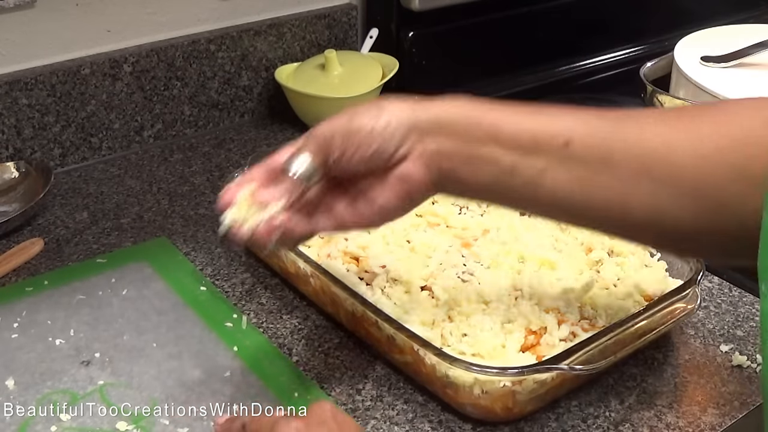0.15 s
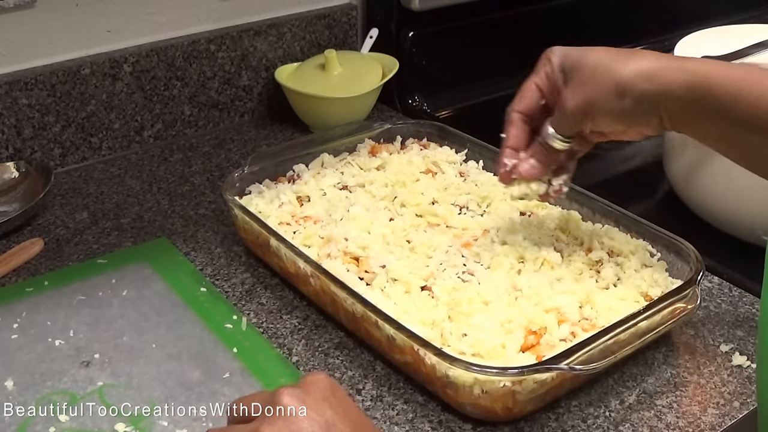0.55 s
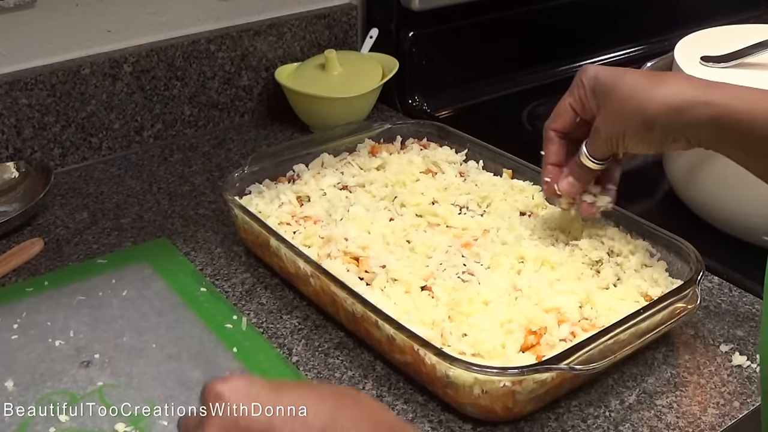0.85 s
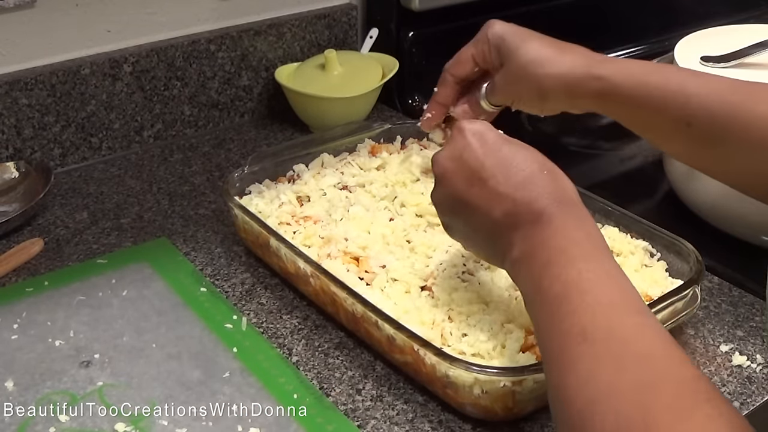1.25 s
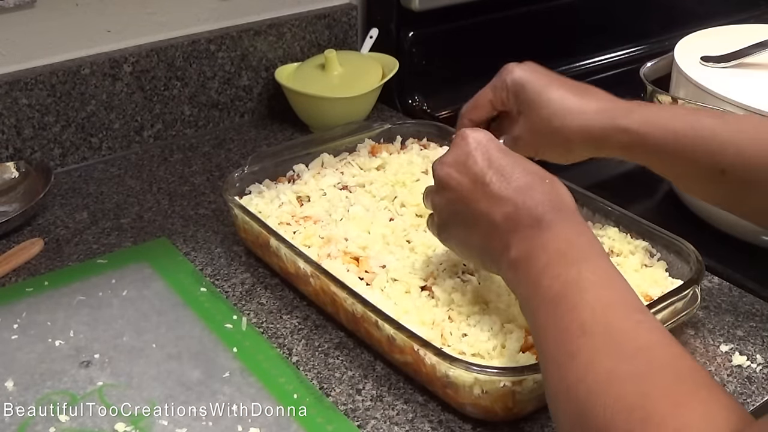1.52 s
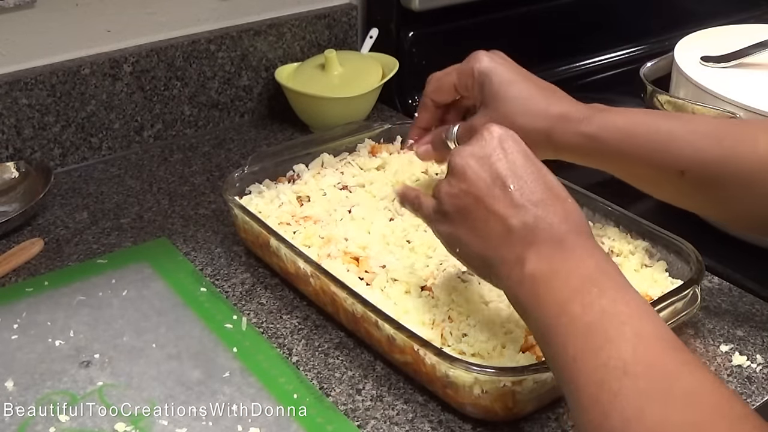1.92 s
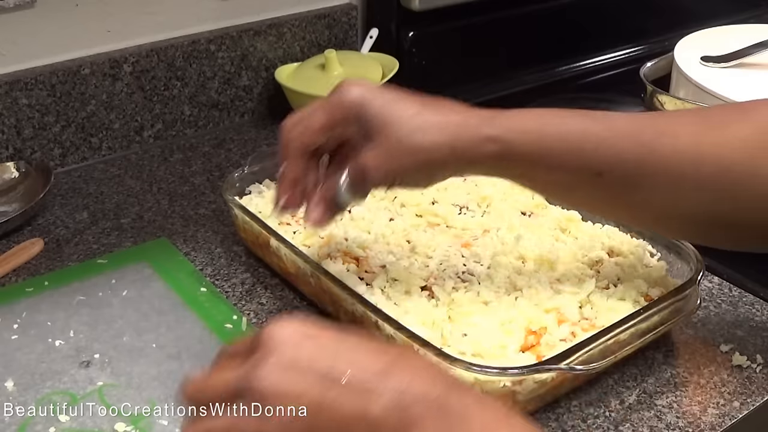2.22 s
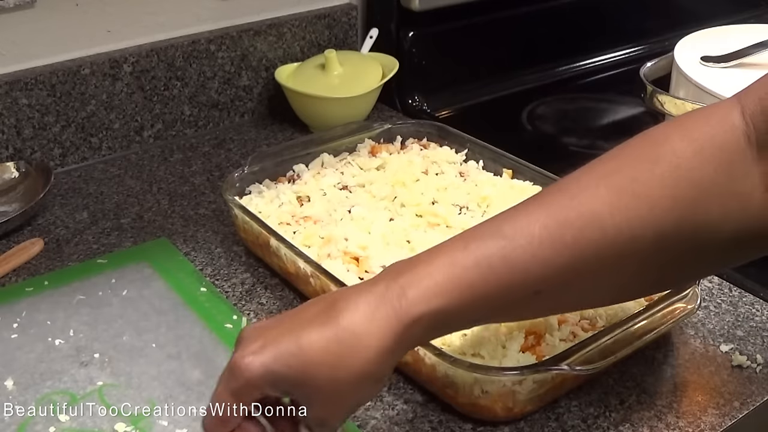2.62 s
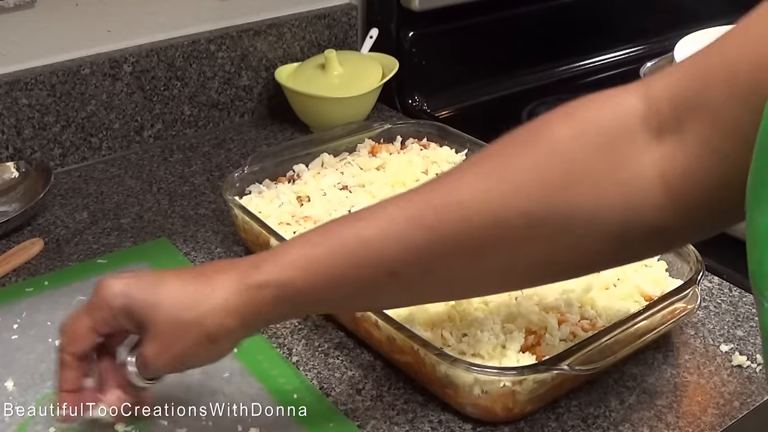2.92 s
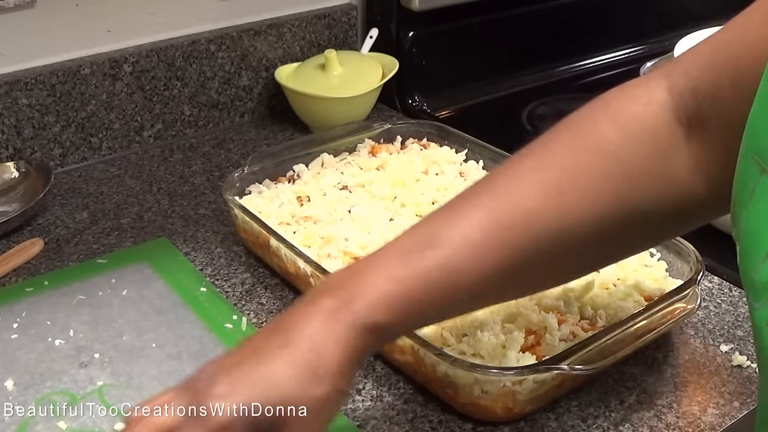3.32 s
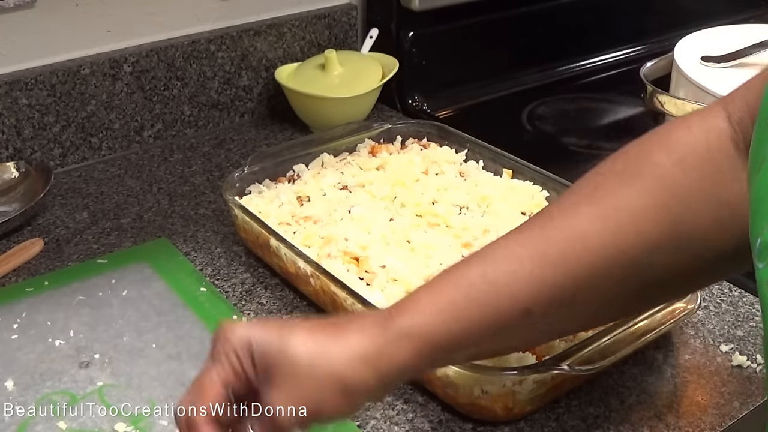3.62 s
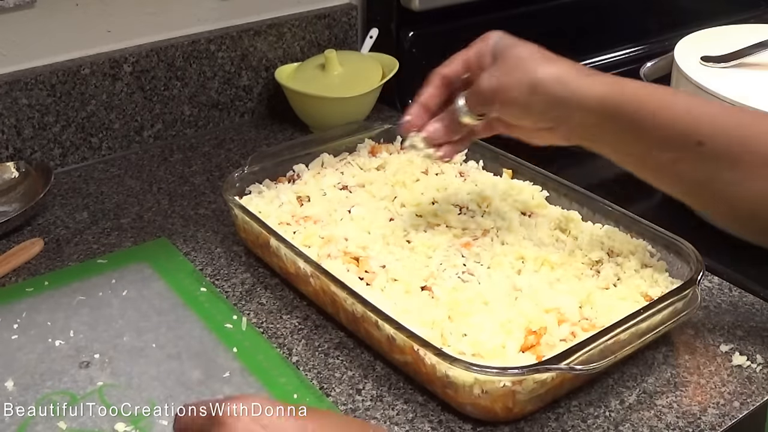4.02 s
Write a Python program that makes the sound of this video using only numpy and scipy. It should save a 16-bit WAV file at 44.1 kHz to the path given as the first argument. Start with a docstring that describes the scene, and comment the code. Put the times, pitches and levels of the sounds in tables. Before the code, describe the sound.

A quiet home kitchen, heard close up in stereo, with soft air noise, a faint appliance hum, a very thin high whistle and a camera focus motor chirping weakly and rapidly, about thirty tiny whines a second, its pitch wandering. In the first 0.4 seconds there are scattered tiny sticky ticks and a faint pat. From about 0.4 to 0.63 fingertips rub moist shreds in short soft hisses, strongest near 0.6, then part with a sharp, bright snap at 0.65. A small tick follows at 0.74, then only room tone until 2.65. There the hand pats a thin plastic mat with light snapping thuds and scrapes until 2.9. Between 3.0 and 3.65 come more pats and dry, hissing, crackling strokes, busiest from 3.2. They fade to faint rustling, with small ticks and a light pat around 3.8 and a little cluster of dropped shreds near 4.04.

```python
"""A small kitchen: shredded cheese is sprinkled over a baking dish, then another pinch is swept up from a mat.
Fingertips rub shreds with filtered stick-slip noise; the shreds crack and the fingers part with a bright snap.
The hand pats a thin plastic mat (ringing modes, snap, thud) and drags shreds over it as shaped hiss and crackle.
A few shreds drop near the end. Appliances hum as wavering sines over soft air noise, and a camera's focus motor
chirps faintly and regularly: short sine bursts with small barrel rings."""
import sys
import numpy as np
from scipy import signal
from scipy.fft import rfft, irfft, next_fast_len
from scipy.io import wavfile

SR = 44100
rng = np.random.default_rng(int(sys.argv[2]) if len(sys.argv) > 2 else 0)


def wav_record(signal):
    """Record a signal, one row per channel, as 16-bit PCM in the file named by sys.argv[1]."""
    frames = np.transpose(np.atleast_2d(signal))
    bounded = np.clip(frames, -1, 1)
    # unit amplitude maps onto the largest positive 16-bit level
    quanta = np.round(bounded * 32767).astype(np.int16)
    wavfile.write(sys.argv[1], SR, quanta)


N = 183676

# fingertip rubs: middle t/s, length/s, hiss level/dB before trim, squish level/dB relative to the hiss
RUBS = [(0.4, 0.046, -54, -2), (0.496, 0.082, -52.5, -16), (.562, 0.036, -61.5, 5.5),
        (0.604, 0.048, -42, -6), (0.626, 0.02, -54.5, 13)]
# spectrum of the dry rubbing hiss: f/Hz, relative level/dB
RUB_HISS = [(1470, -23), (2500, -5.5), (2700, -3), (5920, -5), (6640, -0.5), (8550, -1), (9510, -12.5),
            (12100, -13.5), (15500, -28)]
# spectrum of the moist squish: f/Hz, relative level/dB
RUB_SQUISH = [(130, -40), (220, -17), (377, -4.5), (603, -18), (754, -2.5), (1580, -6), (1650, 3.5),
              (3200, -16.5), (4160, -32), (7040, -120)]
# sticky shreds parting and landing: t/s, level/dB before trim, pitch f/Hz
TICKS = [(0.007, -33.5, 3050), (0.156, -36, 3700), (0.300, -42, 5970), (0.3098, -32, 2730),
         (0.352, -45, 5000), (0.371, -40.5, 5470), (0.401, -38.5, 4000), (0.627, -42, 7600),
         (0.737, -41, 4400), (3.148, -32, 7100), (3.7668, -35.5, 5500), (3.83, -50, 6000),
         (4.041, -38.5, 2120), (4.0422, -30.5, 2880), (4.0479, -38, 2920)]
# fingers slipping off each other: t/s, level/dB before trim
FINGER_SNAPS = [(0.6515, -12)]
# resonances of the finger snap: f/Hz, level/dB before trim, t60/s
SNAP_MODES = [(7050, -10, 0.014), (7360, -13, 0.012), (8100, -4.5, 0.0098)]
# spectrum of the snap's crack and its early returns: f/Hz, level/dB
SNAP_CRACK = [(25, -62), (90, -29), (190, -19), (330, 8.5), (560, -4), (780, 9), (1200, -5.5), (2000, 1.5),
              (3500, 7), (5500, -4), (7000, 12), (8300, 7.5), (9300, -0.5), (12000, 3), (15500, -25)]
# hand strokes over the mat: start t/s, length/s, level/dB before trim,
# then relative to it: mat crackle level/dB, fizz level/dB, counter rumble level/dB
SWEEPS = [(2.65, 0.064, -54.5, 2, -19, -12), (2.718, 0.091, -45, -12, -13.5, -36),
          (2.836, 0.049, -50.5, -12.5, -11.5, -17), (3.01, 0.2, -62, 2.5, -11, -4.5),
          (3.141, 0.018, -53.5, 5, -8, 1.5), (3.177, 0.087, -48.5, 2, -21, -11),
          (3.245, 0.18, -44, -2.5, -20, -14), (3.309, 0.027, -40.5, -3.5, -21, -9.5),
          (3.401, 0.22, -45.5, -1, -9, -8.5), (3.611, 0.04, -39.5, -3, -9, -9.5),
          (3.722, 0.15, -68.5, 11.5, -4, 1.5), (3.94, .22, -63, -3, -11, -6)]
# spectrum of shreds dragged over the mat: f/Hz, relative level/dB
SWEEP_HISS = [(1800, -36), (2450, 1), (2900, 1.5), (3900, 0), (5200, 0), (6000, -2.5), (6700, -5.5),
              (8500, -7), (9700, -11.5), (15500, -39)]
# spectrum of the high fizz of a stroke: f/Hz, relative level/dB
SWEEP_FIZZ = [(4000, -35), (7000, 5), (9000, -4), (11000, -8), (13000, -13), (15500, -29)]
# spectrum of the mat crackling under pressure: f/Hz, relative level/dB
MAT_CRACKLE = [(710, -47), (1200, -3.5), (1350, -6.5), (1520, -7), (1960, 0.5), (2260, -2.5), (2470, 5),
               (2940, -14), (3090, 1), (3800, -7), (4940, -31), (8360, -120)]
# spectrum of the counter rumbling under the hand: f/Hz, relative level/dB
COUNTER = [(30, -58), (70, -19), (110, -3.5), (183, -16), (230, -16.5), (360, 2.5), (700, -2.5), (870, -1),
           (1400, -2.5), (1900, -28), (3500, -63)]
# resonances under the cupped fingers: f/Hz, relative level/dB, t60/s
FINGERS = [(2860, -7, 0.032), (3250, 0, 0.023), (4450, 0, 0.014), (5240, -5, 0.019), (6380, -5, 0.019)]
# fingers patting the mat down: t/s, level/dB before trim, snap and thud level/dB relative to it
PATS = [(0.1742, -39, 1, 7.5), (2.6502, -37.5, -3, 2), (2.6692, -27, -4, -3), (2.6722, -31, 0.5, -7),
        (2.6777, -39, -7, -15), (2.9913, -30.5, -1, -15), (3.0004, -30, -27, -20), (3.0408, -42, -1, -14),
        (3.076, -38, -7, -19), (3.2051, -31.5, -22, -8), (3.3901, -27.5, -4, -15), (3.4095, -27.5, -20, 3),
        (3.7876, -38.5, -2, -5)]
# modes of the mat: f/Hz, relative level/dB, t60/s
MAT = [(1571, -1, 0.044), (1763, -2, 0.041), (1940, -0.5, 0.064), (2057, -5, 0.022), (2165, -4, 0.054),
       (2350, -4.5, 0.016), (2430, -9, 0.039), (2820, -6.5, 0.04), (3090, -3, 0.021), (4140, -26, 0.032),
       (4500, -35, .04), (5170, -14, 0.051)]
# pitch of the focus motor as it hunts: t/s, f/Hz
FOCUS = [(0, 2930), (.55, 2850), (.8, 2385), (1.25, 2659), (1.45, 3450), (1.7, 3103), (2.6, 2942),
         (3.15, 2644), (4.16, 2710)]
# steady lines of the appliances: f/Hz, RMS level/dB
HUM = [(84, -80.5), (118, -77.5), (180, -76), (240, -75.5), (300, -75.5), (420, -77), (480, -78.5),
       (600, -75), (660, -68.5), (780, -74.5), (840, -78), (1949, -70), (2099, -76.5), (7870, -76.5)]
# spectrum of the air noise: f/Hz, relative level/dB
AIR = [(15, -14), (25, -14.5), (174, -10), (299, -5.5), (352, -10), (542, -4.5), (654, -6.5), (1010, -5.5),
       (1820, -7.5), (1980, -7.5), (2260, -8.5), (2660, -8.5), (4570, -11.5), (5980, -12), (15800, -19.5)]
# stereo width of diffuse sound: f/Hz, side level over mid level/dB
WIDTH = [(30, -3), (60, -11), (110, -24), (200, -9.5), (380, -5), (700, -4), (1300, -1), (2400, -2),
         (4400, -6), (8000, -11), (15000, -78.5)]
# decay of the room: f/Hz, t60/s
KITCHEN = [(200, 0.29), (530, 0.4), (1400, 0.31), (3700, 0.23), (10000, 0.21)]
# strength of the room's return by pitch: f/Hz, level/dB before trim
WALLS = [(300, -0.5), (1000, 2), (3000, -1), (7300, -8), (14000, -7.5)]
# phase across the microphone pair: f/Hz, lead of the left/rad
PORT_PHASE = [(60, -0.23), (260, -0.32), (600, -0.84), (1290, -0.96), (2200, -0.65), (3600, -0.57),
              (6500, -0.51), (9000, -0.27), (15000, 0.12)]

SWEEP_ATTACK_S, SWEEP_RELEASE_S = 0.0092, 0.024  # time constants: hand getting going, coming to rest
RUMBLE_RELEASE_S = 0.071  # the counter settles more slowly
SHIFT_HZ, SHIFT_DB = 16, 2.5  # the colour of the hiss shifts as the fingers open and close
STEP_HZ, FIRST_STEP_S = 29.97, 0.0205  # focus motor steps
WHINE_DB, WHINE_UNEVEN_DB = -60, 2.5  # peak level away from the barrel resonance, random drift
BARREL_HZ, BARREL_WIDTH_HZ, BARREL_BOOST_DB = 2704, 280, 8.5
AIR_DB = -57.6
WHISTLE_HZ, WHISTLE_DB, WHISTLE_WAVER_DB = 5840, -75, -0.5
CUTOFF_HZ = 15900
TIME = np.arange(N) / SR
PADDED = next_fast_len(N + SR // 2, True)
BINS = np.maximum(np.fft.rfftfreq(PADDED, 1 / SR), 1)


def rubbing():
    """Moist shreds slide between fingertips: dense stick-slip grains, coloured as hiss and as squish."""
    middle, length, db, squish_db = np.transpose(RUBS)
    shapes = swell(middle[:, None], length[:, None])
    hiss_gain = overlap(shapes, db)
    squish_gain = overlap(shapes, db + squish_db)
    grains = slips(per_s=9000, spread_db=0.5, clump_db=1.0)
    hiss = from_db(0.5) * hiss_gain * rms_one(colour(grains, RUB_HISS))
    squish = squish_gain * rms_one(colour(grains, RUB_SQUISH))
    return hiss + squish


def ticks():
    """Each shred gives a small crack around its own pitch and a few cycles of ring."""
    out = np.zeros(N)
    for s, db, hz in TICKS:
        contact = crumble(clicks([s], from_db(db)), t60=0.035, share=1.3)
        tone = from_db(-1.0) * ring(contact, hz, 7.0 / hz)
        crack = from_db(11.5) * band(band(contact, 0.5 * hz, 1.61 * hz), 970, 9600)
        out += tone + crack
    return out


def snap():
    """A sharp bright snap; the dish and the counter throw it back over the next few milliseconds."""
    s, db = np.transpose(FINGER_SNAPS)
    hit = clicks(s, from_db(db))
    direct = from_db(-1.0) * sum(from_db(level) * ring(hit, hz, t60) for hz, level, t60 in SNAP_MODES)
    t = TIME[:SR // 20]
    delay_s = 0.0025  # the returns are strongest after this time
    echoes = rng.standard_normal(len(t)) * t / delay_s * np.exp(-t / delay_s)
    thrown_back = signal.fftconvolve(hit, echoes / np.linalg.norm(echoes))[:N]
    return direct + colour(from_db(-6.0) * hit + from_db(4.5) * thrown_back, SNAP_CRACK)


def sweeping():
    """Shreds dragged over the mat hiss and fizz; pressure makes the mat crackle and the counter rumble."""
    start, length, db, crackle_db, fizz_db, rumble_db = np.transpose(SWEEPS)
    start, length = start[:, None], length[:, None]
    shapes = stroke(start, length, SWEEP_RELEASE_S)
    hiss_gain = overlap(shapes, db)
    crackle_gain = overlap(shapes, db + crackle_db)
    fizz_gain = overlap(shapes, db + fizz_db)
    rumble_gain = overlap(stroke(start, length, RUMBLE_RELEASE_S), db + rumble_db)

    # many tiny slips, and among them whole shreds that let go
    tiny = rms_one(slips(per_s=9000, spread_db=0.5, clump_db=1.04))
    whole = rms_one(slips(per_s=170, spread_db=1.5, clump_db=1.5))
    fine = shifting(tiny + 0.33 * whole)
    coarse = slips(per_s=3000, spread_db=2.5, clump_db=1.5)
    fizz_grains = slips(per_s=6000, spread_db=-0.5, clump_db=2.0)

    crackle = from_db(-1.5) * rms_one(colour(coarse, MAT_CRACKLE))
    mat = crackle + from_db(-3.5) * rms_one(mat_modes(fine))
    hollow = sum(from_db(level) * ring(coarse, hz, t60) for hz, level, t60 in FINGERS)
    shreds = from_db(0.5) * rms_one(colour(fine, SWEEP_HISS)) + from_db(-7.5) * rms_one(hollow)
    fizz = from_db(5.0) * rms_one(colour(fizz_grains, SWEEP_FIZZ))
    rumble = from_db(-2.0) * rms_one(colour(coarse, COUNTER))
    return hiss_gain * shreds + fizz_gain * fizz + crackle_gain * mat + rumble_gain * rumble


def pats():
    """The mat is pressed onto the counter: its modes, a small snap and a dull thud."""
    s, db, snap_db, thud_db = np.transpose(PATS)
    body = mat_modes(crumble(clicks(s, from_db(db - 7.0)), t60=0.0049, share=0.095))
    snap_hits = clicks(s, from_db(db + snap_db + 13.5))
    snap_part = band(crumble(snap_hits, t60=0.068, share=3.64), 1800, 4400)
    thud_hits = clicks(s, from_db(db + thud_db + 14.0))
    thud = band(crumble(thud_hits, t60=0.023, share=1.32), 350, 1760)
    return body + snap_part + thud


def mat_modes(force):
    """The thin mat rings briefly: decaying modes of alternating sign, driven by the force."""
    return sum((-1) ** k * from_db(db) * ring(force, hz, t60) for k, (hz, db, t60) in enumerate(MAT))


def focus_motor():
    """The lens steps forth and, longer, back; each step whines, loudest near the barrel's resonance."""
    hz = np.interp(TIME, *np.transpose(FOCUS))
    boost_db = BARREL_BOOST_DB / (1 + (2 * (hz - BARREL_HZ) / BARREL_WIDTH_HZ) ** 2)
    db = WHINE_DB + WHINE_UNEVEN_DB * drift(12) + boost_db
    steps = (TIME - FIRST_STEP_S) * STEP_HZ
    age = steps % 1 / STEP_HZ
    back = np.floor(steps) % 2  # every other step goes back
    length = np.where(back, 0.0125, 0.009)
    burst = np.sin(np.pi * np.clip(age / length, 0, 1)) ** 0.89
    whine = np.sin(2 * np.pi * np.cumsum(hz) / SR + drift(25))
    # every start jolts the lens barrel into a short ring, its upper mode less on the way back
    jolts = np.diff(np.floor(steps), prepend=-1) * from_db(3.4 * drift(32))
    low_ring = from_db(-56.5) * ring(jolts, BARREL_HZ, 0.027)
    high_ring = from_db(-53.5) * ring(jolts * (1 - 0.38 * back), 3510, 0.017)
    return from_db(db) * burst * whine + low_ring + high_ring


def room_tone():
    """Soft air noise, appliance lines with slightly wavering phase, and a thin, gently wavering whistle."""
    out = from_db(AIR_DB) * rms_one(colour(diffuse(), AIR))
    whistle_db = WHISTLE_DB + WHISTLE_WAVER_DB * drift(0.73)
    for hz, db in HUM + [(WHISTLE_HZ, whistle_db)]:
        phase = 2 * np.pi * (hz * TIME + rng.random()) + 0.25 * drift(0.93)
        out += np.sqrt(2) * from_db(db) * np.sin(phase)  # RMS to peak
    return out


def kitchen(x):
    """Room reverb: a diffuse noise tail with its own decay time in each band."""
    edges, t = np.geomspace(100, 16000, 8), TIME[:SR // 2]
    noise, tail = diffuse()[:, :len(t)], 0
    for low, high in zip(edges, edges[1:]):
        t60 = at_hz(KITCHEN, np.sqrt(low * high))
        tail = tail + band(noise, low, high) * from_db(-60 * t / t60)
    tail = tail * (1 - np.exp(-t / 0.0039))  # the reverb builds up softly
    return through(x, rfft(tail / np.linalg.norm(tail[0]), PADDED))


def diffuse():
    """Stereo noise arriving from all sides, its width set by pitch."""
    mid, side = rng.standard_normal((2, N))
    return mid + through(side, from_db(at_hz(WIDTH, BINS))) * [[1], [-1]]


def slips(per_s, spread_db, clump_db):
    """Stick-slip of many shreds: random clicks of uneven size that come in louder and softer clumps."""
    sizes = from_db(spread_db * np.minimum(rng.exponential(1, N), 4)) * rng.choice([-1, 1], N)
    return sizes * (rng.random(N) < per_s / SR) * from_db(clump_db * drift(62))


def crumble(x, t60, share):
    """Each contact is followed by a dying spray of tiny ones."""
    t = TIME[:SR // 10]
    spray = rng.standard_normal(len(t)) * from_db(-60 * t / t60)
    return x + share * signal.fftconvolve(x, spray / np.linalg.norm(spray))[:N]


def clicks(times, sizes):
    """Single impulses at the given moments."""
    out = np.zeros(N)
    out[np.round(np.asarray(times) * SR).astype(int)] = sizes
    return out


def ring(x, hz, t60):
    """A two-pole resonator: a unit click starts a decaying sine of initial height 1."""
    r, w = from_db(-60 / (t60 * SR)), 2 * np.pi * hz / SR
    return signal.lfilter([0, np.sin(w)], [1, -2 * r * np.cos(w), r * r], x + 1e-18)


def swell(middle, length):
    """A bell-shaped rise and fall."""
    return np.exp(-(2 * (TIME - middle) / length) ** 2)


def stroke(start, length, release_s):
    """Attack, hold and release of one movement of the hand."""
    age = np.maximum(TIME - start, 0)
    return (1 - np.exp(-age / SWEEP_ATTACK_S)) * np.exp(-np.maximum(age - length, 0) / release_s)


def overlap(shapes, levels_db):
    """Joint gain of overlapping movements: their powers add."""
    return np.sqrt(from_db(levels_db) ** 2 @ np.square(shapes))


def shifting(x, count=14):
    """Let narrow bands of a sound rise and fall independently."""
    centres = np.geomspace(1200, 12000, count)
    spectrum = rfft(x, PADDED)
    # triangular bands that add up to the whole
    bands = [irfft(spectrum * np.interp(BINS, centres, only), PADDED)[:N] for only in np.eye(count)]
    return sum(part * from_db(SHIFT_DB * drift(SHIFT_HZ)) for part in bands)


def drift(rate_hz):
    """Slow random wander of unit RMS: noise at every 40th sample through a double low-pass."""
    r = np.exp(-80 * np.pi * rate_hz / SR)
    noise = rng.standard_normal(N // 40 + 2002)
    slow = signal.lfilter([1], [1, -2 * r, r * r], noise)[2000:]  # skip the filter's run-in
    return np.interp(np.arange(N) / 40, np.arange(len(slow)), rms_one(slow))


def colour(x, points):
    """Causal (minimum-phase) filter with the given spectrum."""
    cepstrum = irfft(np.log(from_db(at_hz(points, BINS))), PADDED)
    cepstrum[1:PADDED // 2] *= 2
    cepstrum[PADDED // 2 + 1:] = 0
    return through(x, np.exp(rfft(cepstrum)))


def band(x, low_hz, high_hz):
    """Butterworth band-pass."""
    edges = [low_hz, min(high_hz, 0.45 * SR)]
    return signal.sosfilt(signal.butter(2, edges, "band", fs=SR, output="sos"), x + 1e-18)


def through(x, response):
    """Apply a frequency response."""
    return irfft(rfft(x, PADDED) * response, PADDED)[..., :N]


def at_hz(points, hz):
    """Read a table on a log-frequency axis."""
    f, value = np.transpose(points)
    return np.interp(np.log(hz), np.log(f), value)


def rms_one(x):
    """Scale to unit power."""
    return x / np.sqrt(np.mean(x ** 2) + 1e-20)


def from_db(db):
    """Decibels to gain."""
    return 10 ** (np.asarray(db) / 20)


def scene():
    """Hands, room return and room tone share a phase offset between the ears; the motor sits centred."""
    hands = rubbing() + sweeping() + pats() + ticks()
    flick = snap()
    walls = kitchen(colour(from_db(-8.0) * hands + from_db(-5.0) * flick, WALLS))
    sound = hands + flick + walls + room_tone()
    # the right leads over most of the range: the hands work a little to the right
    half_phase = 0.5 * at_hz(PORT_PHASE, BINS)
    placed = through(sound, np.exp(1j * half_phase * np.array([[1], [-1]])))
    return placed + focus_motor()


def record(dry):
    """The deepest bass is rolled off and the top is cut steeply."""
    lean = signal.sosfilt(signal.butter(2, 28, "high", fs=SR, output="sos"), dry)
    return signal.sosfilt(signal.ellip(10, 0.1, 80, CUTOFF_HZ, fs=SR, output="sos"), lean)


dry = scene()
out = record(dry)
wav_record(out)
```